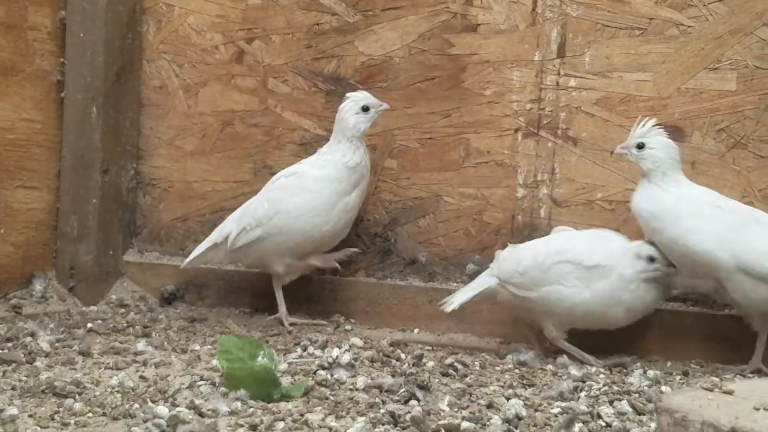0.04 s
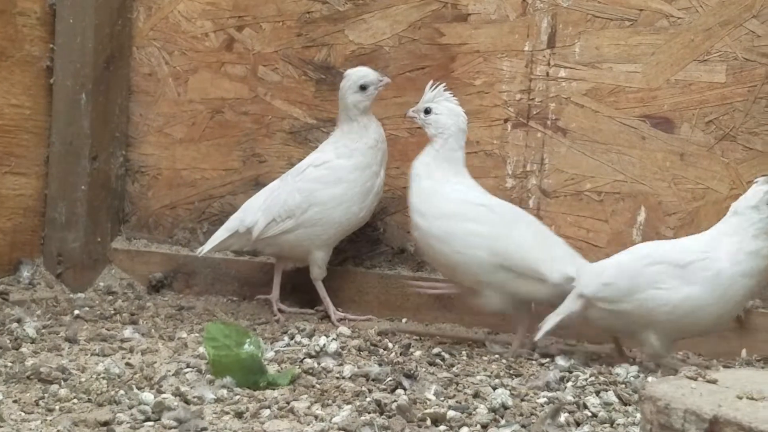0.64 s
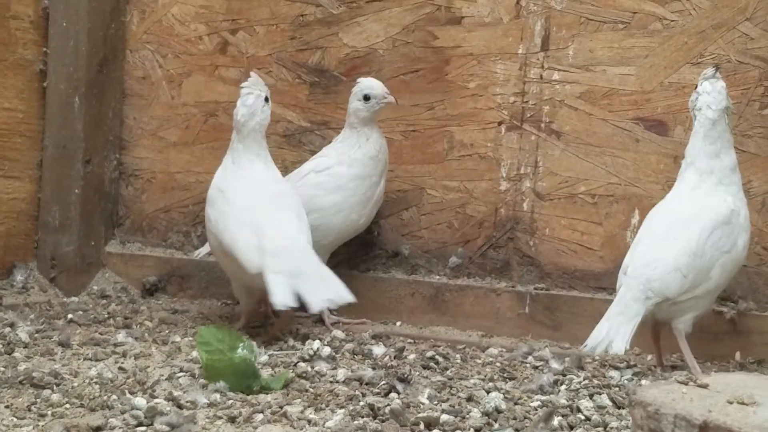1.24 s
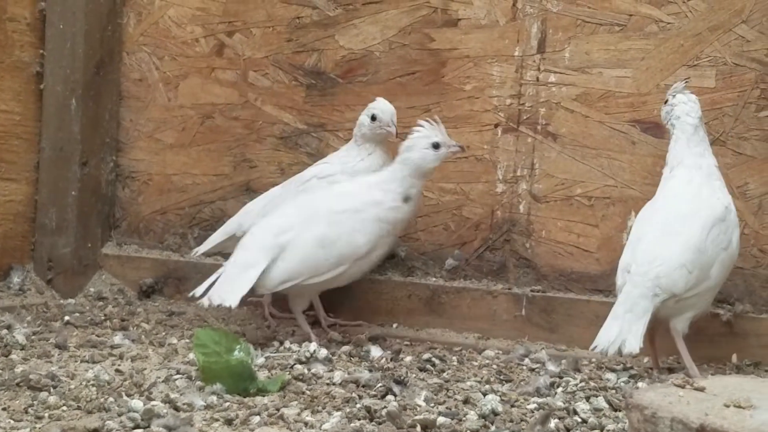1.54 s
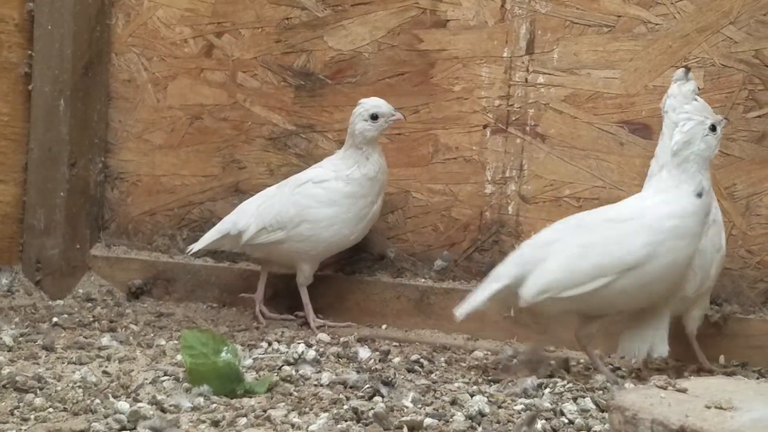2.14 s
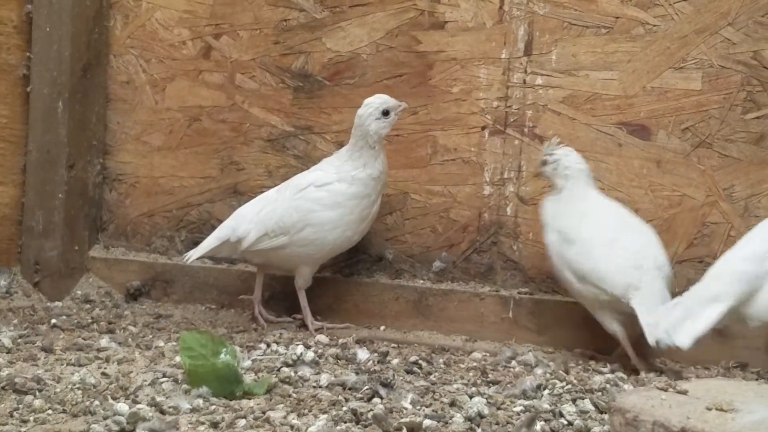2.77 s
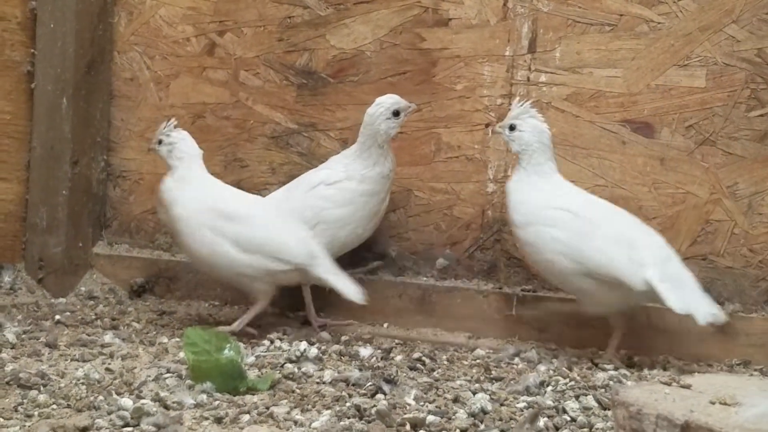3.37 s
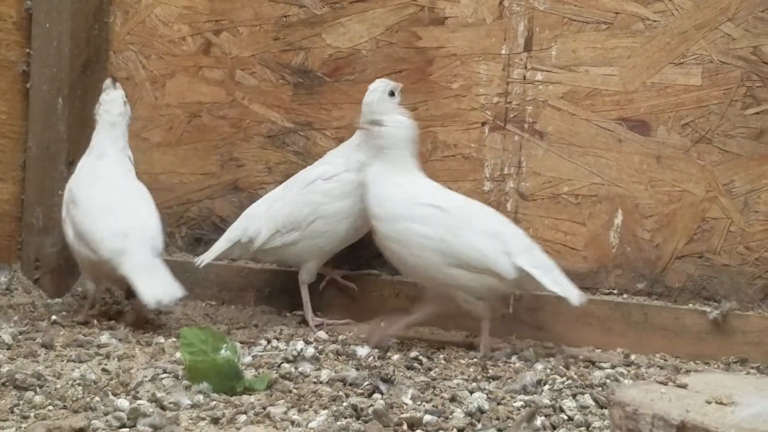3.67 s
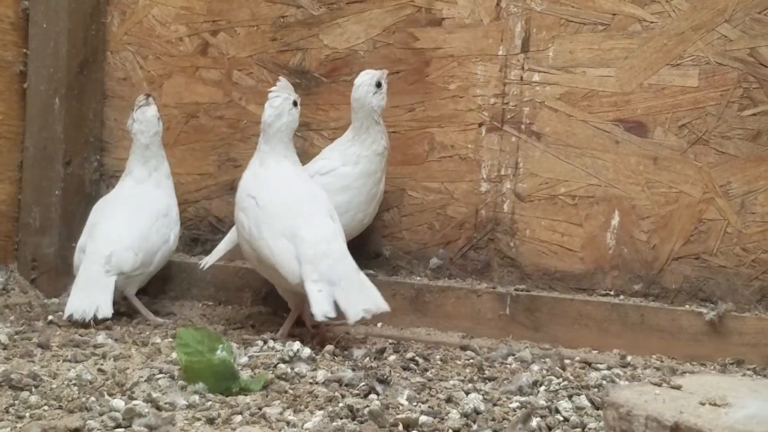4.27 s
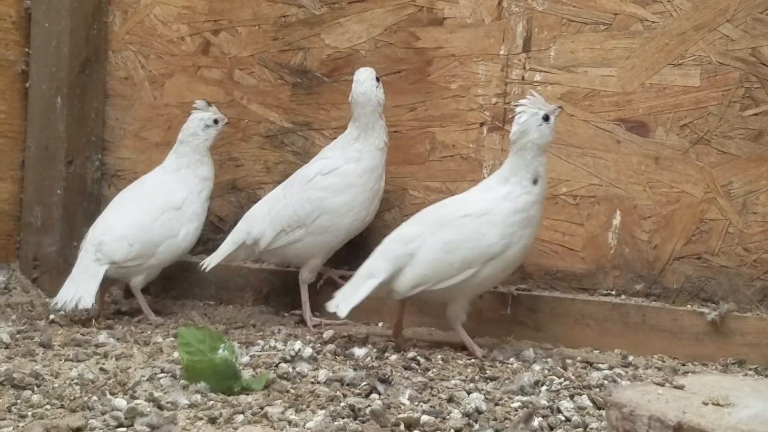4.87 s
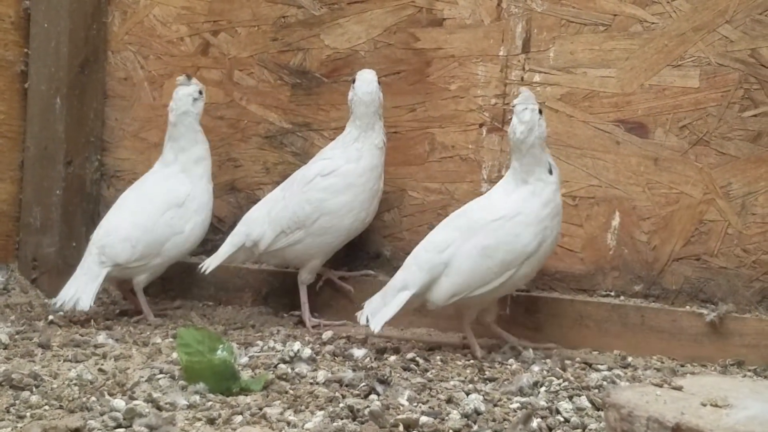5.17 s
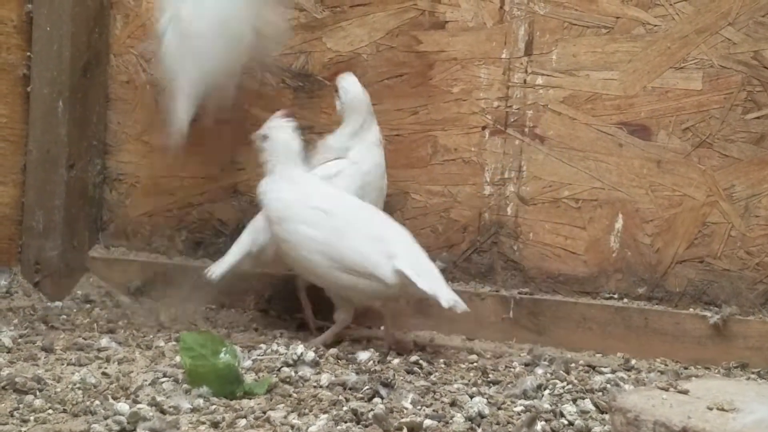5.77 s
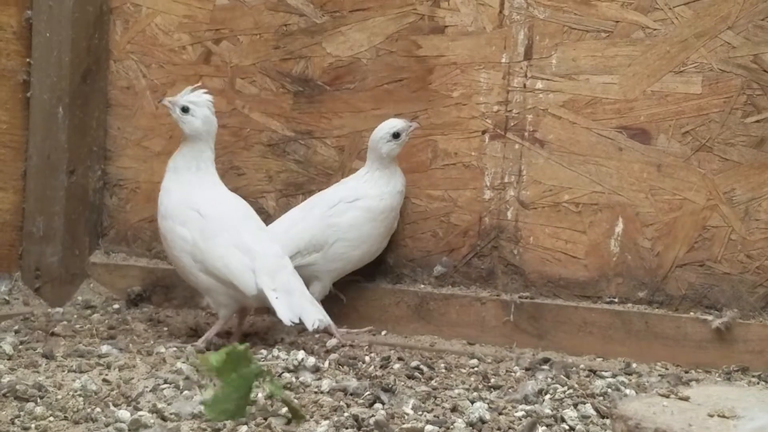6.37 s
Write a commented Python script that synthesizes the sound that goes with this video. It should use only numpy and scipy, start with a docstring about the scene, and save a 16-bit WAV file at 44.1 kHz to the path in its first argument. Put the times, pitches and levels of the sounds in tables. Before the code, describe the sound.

Quail chirp, whine and cluck over shifting gravel and a low rumble, then one bursts into flight with loud wingbeats.

```python
"""Bobwhite quail call in a plywood pen: hoarse upsweeps, sharp chips and whines, later clucks and
whistles, each a wavering tone from the syrinx thrown back by the close walls. Their feet stir the
gravel over a low outdoor rumble. Near the end one bird bursts into flight past the microphone: each
wingbeat is a feather slap and a push of air, followed by a draught and a last flutter."""
import sys
import numpy as np
from scipy import signal
from scipy.fft import rfft, irfft, next_fast_len
from scipy.io import wavfile

SR = 44100
rng = np.random.default_rng(int(sys.argv[2]) if len(sys.argv) > 2 else 0)


def master(y):
    """Save y as 16-bit WAV."""
    cut = np.clip(np.atleast_2d(y).T, -1, 1)
    pcm = np.round(cut * 32767)  # scale
    wavfile.write(sys.argv[1], SR, pcm.astype(np.int16))


N = 291942
TIME = np.arange(N) / SR
PROGRESS = np.linspace(0, 1, 60)   # through one call
TAKEOFF_S = 5.72

# spectrum of feathers slapping together: (frequency [Hz], level [dB])
SLAP_SPECTRUM = [(110, -1.5), (240, 1), (410, 3.5), (650, -6.5), (1050, -0.5), (1450, -4.5), (1850, -5.5),
                 (2650, -3.5), (3500, -12.5), (6000, -20), (16000, -33)]
# spectrum of feather hiss: (frequency [Hz], level [dB])
HISS_SPECTRUM = [(1500, -31), (3500, -0.5), (5500, -0.5), (9000, -5), (12000, 2.5), (16000, -0.5)]


def from_db(db):
    """Decibels to gain."""
    return 10 ** (np.asarray(db) / 20)


def rms_one(x):
    """Scale to unit rms."""
    return x / np.sqrt(np.mean(x ** 2) + 1e-20)


def in_time(rows, t=TIME):
    """Join the rows of a curve by straight lines."""
    s, *columns = np.transpose(rows)
    return [np.interp(t, s, c) for c in columns]


def at_hz(points, hz):
    """Read a spectrum on a log-frequency axis."""
    f, value = np.transpose(points)
    return np.interp(np.log(hz + 1), np.log(f), value)


def drift(rate, size=N):
    """A random wander with a spread near one, turning `rate` times a second."""
    knots = rng.standard_normal(size // 8 + 2)
    return np.interp(np.arange(size) * rate / SR, np.arange(len(knots)), knots)


def noise(spectrum):
    """Coloured stereo noise, alike on both sides in the bass and unrelated in the treble."""
    # likeness of left and right at the microphone: (frequency [Hz], correlation [0 to 1])
    likeness = [(100, 0.91), (250, 0.77), (500, 0.61), (1000, 0.32), (2000, 0.042), (16000, 0.011)]
    size = next_fast_len(N, True)
    hz = np.arange(size // 2 + 1) * SR / size
    mid, side = rfft(rng.standard_normal((2, size)))
    alike = at_hz(likeness, hz)
    both = np.sqrt(1 + alike) * mid + np.sqrt(1 - alike) * side * [[1], [-1]]
    return rms_one(irfft(both * from_db(at_hz(spectrum, hz)), size)[:, :N])


def grains(spectrum, rough_db, rate):
    """Noise broken into many tiny contacts."""
    return rms_one(noise(spectrum) * from_db(rough_db * np.clip(drift(rate), -2, 2)))


def bursts(starts, rises, levels_db, t60, tail_db, tail_t60):
    """Envelope of blows that swell, fall quickly and leave a weak tail."""
    power = np.zeros(N)
    for s, rise, db in np.broadcast(starts, rises, levels_db):
        at = int(s * SR)
        t = TIME[:min(SR // 3, N - at)]
        after = np.maximum(t - rise, 0)
        fall = from_db(-60 * after / t60) + from_db(tail_db - 60 * after / tail_t60)
        power[at:at + len(t)] += (from_db(db) * np.minimum(t / rise, 1) * fall) ** 2
    return np.sqrt(power)


def ring(x, hz, t60):
    """One resonance: a click sets a decaying sine ringing."""
    r, w = from_db(-60 / (t60 * SR)), 2 * np.pi * hz / SR
    return signal.lfilter([0, np.sin(w)], [1, -2 * r * np.cos(w), r * r], x + 1e-18)


def pan(left_db):
    """Gains for a source that is louder on the left by so much."""
    return from_db([[left_db / 2], [-left_db / 2]])


def outdoor_rumble():
    """The open air around the pen: low noise that swells in a few resonances."""
    # outdoor background: (frequency [Hz], level [dB])
    spectrum = [(15, -29), (30, -7.5), (60, -1.5), (100, -7.5), (130, -5), (240, -9), (400, -16.5),
                (600, -19), (980, -15.5), (1700, -24), (3000, -30.5), (5300, -41.5), (9200, -44.5),
                (14700, -38)]
    # resonances of the rumble: (frequency [Hz], level [dB], t60 [s])
    modes = [(37.6, -10, 0.31), (76, -4, 0.19), (152.2, -7.5, 0.2), (214.8, -14, .16), (331.7, -22, 0.18)]
    swellings = sum(from_db(db) * rms_one(ring(rng.standard_normal(N), hz, t60)) for hz, db, t60 in modes)
    return from_db(-50.6) * (from_db(-3) * noise(spectrum) + from_db(-1) * swellings) * pan(-2.2)


def pen(x, diffuse_db, t60):
    """Close plywood walls throw back a few echoes and a short diffuse ring."""
    # wall echoes, a list for the left and one for the right: (delay [s], level [dB])
    walls = [
        [(.0043, -6.5), (.0117, -3), (.0205, -8)],
        [(.0061, -6.5), (.0139, -7), (.0242, -10.5)],
    ]
    t = TIME[:SR // 3]
    response = rng.standard_normal((2, len(t))) * from_db(-60 * t / t60) * (t > .005)
    response *= from_db(diffuse_db) / np.sqrt(np.sum(response ** 2, axis=1, keepdims=True))
    response[:, 0] += 1   # straight to the microphone
    for side, echoes in zip(response, walls):
        for delay, db in echoes:
            side[int(delay * SR)] += from_db(db)
    return signal.fftconvolve(x[None], response, axes=1)[:, :N]


def gravel(faint_count=22):
    """Claws flick fine grit, with faint random footfalls until take-off, over shifting gravel."""
    # the clearest flicks: (time [s], level [dB])
    flicks = [(0.1376, -53), (0.4845, -40), (0.6858, -54), (0.7467, -50), (0.8056, -52), (0.8719, -54.5),
              (1.7814, -49), (1.8746, -52.5), (1.9789, -51), (2.0896, -53), (2.5591, -56), (2.811, -54),
              (2.9891, -51), (3.0834, -56), (3.355, -53), (3.404, -47), (4.146, -49), (4.582, -56.5),
              (4.9297, -50), (5.4864, -54), (5.5393, -48)]
    # gravel shifting underfoot: (time [s], level [dB])
    shuffle = [(0, -75), (.3, -70), (.5, -66), (.9, -68.5), (1.05, -81.5), (3, -69), (3.6, -86), (5.7, -80)]
    # fine grit: (frequency [Hz], level [dB])
    spectrum = [(1500, -12), (4000, -12), (6000, -4), (9000, -10), (12500, 2.5), (16000, 1.5)]
    when, strength = rng.random((faint_count, 2)).T
    faint_s = when * TAKEOFF_S
    faint_db = in_time(shuffle, faint_s)[0] + 7 + 4 * strength
    clear = [(s, db - 7.5) for s, db in flicks]
    s, db = np.vstack([clear, np.c_[faint_s, faint_db]]).T
    grit = bursts(s, .0025, db, t60=.054, tail_db=-5, tail_t60=.25)
    grit = grit * grains(spectrum, rough_db=3.5, rate=930)
    shuffling = from_db(in_time(shuffle)[0]) * grains(spectrum, rough_db=1, rate=100)
    return (grit + shuffling) * pan(-.4)


def pebbles():
    """Now and then a foot knocks pebbles together."""
    # pebble strikes: (time [s], level [dB])
    strikes = [(.422, -43.5), (.726, -50), (0.939, -47.5), (2.09, -51.5), (2.1, -52.5), (3.331, -51),
               (3.346, -58), (3.403, -43)]
    # stone on stone: (frequency [Hz], level [dB])
    spectrum = [(500, -22), (1200, -3), (1700, 5), (3200, 1.5), (5000, -12.5), (9000, -21), (16000, -38)]
    s, db = np.transpose(strikes)
    envelope = bursts(s, .0012, db, t60=.05, tail_db=-12, tail_t60=.22)
    return envelope * grains(spectrum, rough_db=4, rate=800)


def board_knock():
    """A foot lands on the base board with a dull thud."""
    # footfall on the board: (time [s], level [dB])
    knocks = [(2.09, -45.5)]
    s, db = np.transpose(knocks)
    board = noise([(70, -17), (155, -1), (350, -5), (900, -13.5), (2000, -24), (6000, -47)])
    return bursts(s, .004, db, t60=.19, tail_db=-12, tail_t60=.3) * board


def draught():
    """Air and rustling plumage as the flying bird passes the microphone."""
    # course of the flight: (time [s], draught [dB], rustle [dB])
    flight = [(5.705, -93, -69), (5.725, -38, -33.5), (5.8, -33.5, -30.5), (5.98, -24.5, -40.5),
              (6.17, -27, -42.5), (6.36, -29.5, -42), (6.41, -42, -49), (6.55, -30.5, -40.5),
              (6.62, -38.5, -38)]
    # moving air: (frequency [Hz], level [dB])
    spectrum = [(25, -15), (40, -6.5), (85, 2.5), (120, -5.5), (170, -8), (300, -14.5), (600, -39),
                (2000, -57)]
    air_db, rustle_db = in_time(flight)
    air = from_db(air_db - 3) * noise(spectrum)
    plumage = grains(SLAP_SPECTRUM, rough_db=1.5, rate=370)
    plumage += from_db(-8.5) * grains(HISS_SPECTRUM, rough_db=6, rate=400)
    return air * pan(-3) + from_db(rustle_db + .5) * plumage * pan(.85)


def wing_strokes(beat_s=.0592, flutter_hollow_hz=1495):
    """Beats and flutters: (time [s], rise [s], push [dB], slap [dB], hiss [dB], hollow [Hz])."""
    # successive wingbeats: (air push [dB], slap [dB], hiss [dB], hollow under the wing [Hz])
    beats = [(-27.5, -21, -28.5, 820), (-14.5, -25, -26, 2450), (-13, -25, -30, 2680),
             (-17.5, -29.5, -32, 2260), (-20.5, -23.5, -28, 2100), (-22, -23, -28.5, 1460),
             (-23.5, -22, -25, 1410), (-16.5, -19.5, -23, 980), (-20.5, -22, -20.5, 2940),
             (-22.5, -33, -36.5, 1110)]
    # loose flutters of half-open wings: (time [s], rise [s], level [dB])
    flutters = [(5.826, .0046, -28), (6.296, 0.0023, -33), (6.345, 0.016, -28.5), (6.462, .004, -38),
                (6.492, 0.0056, -40), (6.536, .004, -31), (6.555, 0.0029, -28.5)]
    starts = TAKEOFF_S + beat_s * np.arange(len(beats))
    rises = np.geomspace(.0145, .0022, len(beats))   # the strokes sharpen as the bird gains speed
    loose = [(s, rise, db - 8.5, db, db - .5, flutter_hollow_hz) for s, rise, db in flutters]
    return np.vstack([np.c_[starts, rises, beats], loose])


def wings():
    """Each stroke slaps the feathers together and shoves air into the pen, which booms briefly."""
    # modes of the pen's air and boards: (frequency [Hz], level [dB], t60 [s])
    modes = [(82, -14, 0.14), (131, -3.5, 0.065), (167, -1, 0.17), (230, -5.5, 0.079), (298, -6.5, 0.077),
             (358, -6.5, 0.075), (434, -14.5, .06)]
    starts, rises, push_db, slap_db, hiss_db, hollow_hz = wing_strokes().T
    slap = bursts(starts, rises, slap_db, t60=.1, tail_db=-19.5, tail_t60=.18)
    slap = slap * grains(SLAP_SPECTRUM, rough_db=2.4, rate=700)
    pushes = np.zeros(N)
    for start, rise, shove_db, db, hz in zip(starts, rises, push_db, slap_db, hollow_hz):
        at = int(start * SR)
        t = TIME[:min(SR // 8, N - at)]
        # the pocket of air under the wing colours every stroke differently
        hollow = rms_one(ring(rng.standard_normal((2, len(t))), hz, t60=.015))
        envelope = np.minimum(t / rise, 1) * from_db(db - 4.5 - 60 * np.maximum(t - rise, 0) / .1)
        slap[:, at:at + len(t)] += hollow * envelope
        # a slower stroke gives a rounder push of air
        shove = np.exp(-.5 * ((t - .29 * rise) / (.064 * rise)) ** 2)
        pushes[at:at + len(t)] -= from_db(shove_db) * shove / shove.sum()
    boom = sum((-1) ** k * from_db(db) * ring(pushes, hz, t60) for k, (hz, db, t60) in enumerate(modes))
    hiss = bursts(starts, rises, hiss_db, t60=.08, tail_db=-22, tail_t60=.11)
    hiss = hiss * grains(HISS_SPECTRUM, rough_db=3, rate=1500)
    # one stroke cracks like a whip
    crack = bursts(starts=[6.1935], rises=.001, levels_db=-13.5, t60=.02, tail_db=-25, tail_t60=.06)
    hiss += crack * grains(HISS_SPECTRUM, rough_db=4, rate=1500)
    return boom * pan(-3) + slap * pan(.85) + hiss * pan(-1.1)


def syrinx(calls, overtone_db, jitter, flutter_db, edge_s=.004):
    """The bird's voice: an unsteady tone of four harmonics, each one step below the last."""
    out = np.zeros(N)
    for call in calls:   # rows of (time [s], pitch [Hz], level [dB], optional overtone step [dB])
        start, end = call[0][0] - edge_s, call[-1][0] + edge_s
        span = slice(max(int(start * SR), 0), int(end * SR))
        t = TIME[span]
        hz, db, *own_step = in_time(call, t)
        step_db = own_step[0] if own_step else overtone_db
        hz = hz * (1 + jitter * drift(350, size=SR)[:len(t)])
        phase = 2 * np.pi * np.cumsum(hz) / SR
        gate = np.sin(np.pi / 2 * np.clip(np.minimum(t - start, end - t) / (2 * edge_s), 0, 1))
        tone = sum(from_db(step_db * (k - 1)) * np.sin(k * phase) * (hz * k < SR / 2) for k in range(1, 5))
        out[span] += np.sqrt(2) * tone * gate * from_db(db + flutter_db * drift(88.2, size=SR)[:len(t)])
    return out


def swell(peak_at, rise_db, fall_db):
    """Level through a call: up to a peak at this share of its length, then down."""
    return np.interp(PROGRESS, [0, peak_at, 1], [-rise_db, 0, -fall_db])


def throat(hz, db_per_octave, resonance_hz=2600):
    """Level lost as the pitch leaves the throat's resonance."""
    return -db_per_octave * np.abs(np.log2(hz / resonance_hz))


def cheeps():
    """Raspy falling cheeps from further off, heard mostly by way of the walls."""
    # cheeps: (time [s], length [s], starting pitch [Hz], level [dB])
    notes = [(0.106, .11, 4680, -57), (.54, 0.073, 4200, -61), (0.738, .11, 4600, -58),
             (1.45, 0.096, 4600, -60.5), (1.891, .1, 4410, -60), (2.56, .1, 4010, -67),
             (3.029, .06, 3490, -61.5), (3.501, .11, 4200, -69.5), (4.974, .11, 4670, -63.5)]
    calls = [[(s, hz, db - 3.5), (s + length / 2, .78 * hz, db - 1.5), (s + length, .6 * hz, db)]
             for s, length, hz, db in notes]
    voice = syrinx(calls, overtone_db=-34, jitter=.06, flutter_db=3.5)
    return pen(voice, diffuse_db=7.5, t60=.4) * pan(1) * from_db(-11)


def twitters(octaves_per_s=4.5, scoop_s=.018):
    """Thin falling notes, some scooping up first, often two at once from both sides of the syrinx."""
    # twitters: (time [s], length [s], pitch [Hz], scoop from below [Hz], level [dB])
    notes = [(2.185, .122, 5300, 1300, -62.5), (2.255, .072, 3380, -4, -53), (2.31, .055, 5580, 0, -68),
             (2.449, .085, 4170, 0, -65), (2.455, .09, 3240, 0, -59), (3.855, .094, 5200, 1100, -59),
             (3.912, .062, 3480, 0, -55), (5.5, .1, 4900, 0, -57), (5.617, .04, 5480, 0, -65)]
    calls = []
    for s, length, top_hz, scoop_hz, db in notes:
        t = length * PROGRESS
        hz = top_hz * 2 ** (-octaves_per_s * t) - scoop_hz * np.exp(-t / scoop_s)
        calls.append(np.c_[s + t, hz, db + swell(.75, rise_db=15, fall_db=3)])
    voice = syrinx(calls, overtone_db=-32, jitter=.013, flutter_db=3)
    return pen(voice, diffuse_db=0, t60=.18) * pan(2) * from_db(-7.5)


def whistles(plunge_s=.075):
    """A quick plunge, then a long line sinking towards the throat's resonance."""
    # whistles: (time [s], length [s], plunge [Hz], sinking from [Hz], to [Hz], level [dB])
    notes = [(4.482, .615, 2005, 3640, 2318, -52.5), (5.264, .435, 1600, 4030, 2540, -50.5)]
    calls = []
    for s, length, plunge_hz, from_hz, to_hz, db in notes:
        t = length * PROGRESS
        hz = from_hz + (to_hz - from_hz) * PROGRESS + plunge_hz * np.exp(-t / plunge_s)
        level_db = db + throat(hz, db_per_octave=17.5) + swell(.3, rise_db=6, fall_db=4)
        calls.append(np.c_[s + t, hz, level_db])
    voice = syrinx(calls, overtone_db=-38, jitter=.017, flutter_db=4.2)
    return pen(voice, diffuse_db=3, t60=.53) * pan(2.2) * from_db(-8.5)


def upsweeps():
    """Hoarse calls that rise ever faster, loudest nearest the throat's resonance."""
    # upsweeps: (time [s], length [s], first pitch [Hz], last pitch [Hz], level [dB])
    notes = [(-.06, .1, 1550, 3950, -46), (0.143, .12, 1594, 3675, -49), (0.391, 0.079, 1615, 3760, -48),
             (0.596, 0.1, 1670, 3780, -48), (4.177, .065, 2330, 3220, -63.5),
             (5.478, 0.021, 3710, 4550, -58)]
    calls = []
    for s, length, first_hz, last_hz, db in notes:
        hz = first_hz + (last_hz - first_hz) * PROGRESS ** 2.2
        calls.append(np.c_[s + length * PROGRESS, hz, db + throat(hz, db_per_octave=18)])
    voice = syrinx(calls, overtone_db=-34, jitter=.045, flutter_db=-2)
    return pen(voice, diffuse_db=1, t60=.33) * pan(3.3) * from_db(-5)


def whines():
    """Close by on the left, held notes that sag or arch and bend late to their last pitch."""
    # whines: (time [s], length [s], first pitch [Hz], last pitch [Hz], sag [Hz], level [dB])
    notes = [(0.523, .21, 1538, 1430, 213.5, -51), (0.762, .135, 1600, 2435, -59, -53.5),
             (1.432, 0.14, 1570, 1600, -20, -49), (1.614, 0.17, 1598, 1900, -25, -50.5),
             (1.899, 0.094, 1598, 2180, 0, -51.5)]
    calls = []
    for s, length, first_hz, last_hz, sag_hz, db in notes:
        hz = first_hz + (last_hz - first_hz) * PROGRESS ** 2.9 - sag_hz * np.sin(np.pi * PROGRESS) ** 2
        calls.append(np.c_[s + length * PROGRESS, hz, db + swell(.5, rise_db=2.5, fall_db=4.5)])
    voice = syrinx(calls, overtone_db=-23, jitter=.014, flutter_db=3.5)
    return pen(voice, diffuse_db=2, t60=.12) * pan(4) * from_db(-6.5)


def clucks(break_hz=443, leap_s=.055, squeak_s=.024, end_s=.025):
    """Close by, a reedy low note gives way, thins while it leaps and lands on a purer squeak."""
    # clucks: (time [s], hold [s], pitch [Hz], level [dB], squeak [Hz], squeak [dB], end [Hz], end [dB])
    notes = [(2.693, 0.016, 407, -50, 2030, -56, 1740, -64),
             (3.881, .069, 436.4, -41, 1892, -45.5, 793, -47),
             (4.255, .06, 380.3, -45.5, 1960, -50, 1880, -61)]
    reediness = [(400, -6.5), (520, -14), (900, -16), (1900, -20)]   # (pitch [Hz], overtone step [dB])
    calls = []
    for s, hold, first_hz, db, squeak_hz, squeak_db, end_hz, end_db in notes:
        low_db = db + swell(.68, rise_db=2.5, fall_db=3.5)
        low = np.c_[s + hold * PROGRESS, first_hz + (break_hz - first_hz) * PROGRESS, low_db]
        leap_hz = break_hz * (.96 * squeak_hz / break_hz) ** PROGRESS
        dip_db = [low_db[-1], db - 9, db - 6.5, squeak_db - 14, squeak_db]
        leap_db = np.interp(PROGRESS, [0, .15, .4, .75, 1], dip_db)
        leap = np.c_[s + hold + leap_s * PROGRESS, leap_hz, leap_db]
        top_s = s + hold + leap_s + squeak_s
        squeak = [(top_s, squeak_hz, squeak_db - 4),
                  (top_s + end_s / 2, squeak_hz + .7 * (end_hz - squeak_hz), end_db - 2),
                  (top_s + end_s, end_hz, end_db)]
        rows = np.vstack([low, leap, squeak])
        calls.append(np.c_[rows, at_hz(reediness, rows[:, 1])])
    voice = syrinx(calls, overtone_db=None, jitter=.025, flutter_db=3)
    return pen(voice, diffuse_db=-6, t60=.15) * pan(-.46) * from_db(-2)


def chips():
    """Sharp chips near the microphone: the pitch plunges within milliseconds, with a rasp on top."""
    # chips: (time [s], level [dB], final pitch [Hz])
    notes = [(.385, -44, 1723), (.9, -39, 1896), (1.329, -37, 1842), (1.796, -39.5, 1872),
             (2.008, -38.5, 1906)]
    # rasp in the voice: (frequency [Hz], level [dB])
    rasp_spectrum = [(1500, -25), (2400, 4), (3200, -2), (3900, 1), (5100, -24), (5800, -5.5), (6600, -10),
                     (7400, -15), (9000, -25)]
    calls = [[(s, 1.42 * hz, db - 12), (s + .00507, 1.17 * hz, db),
              (s + .0118, 1.03 * hz, db - 3), (s + .026, hz, db - 12)] for s, db, hz in notes]
    voice = syrinx(calls, overtone_db=-18, jitter=.055, flutter_db=2, edge_s=.002)
    s, db, _ = np.transpose(notes)
    rasp = bursts(s + .0033, .0069, db - 15, t60=.12, tail_db=-10.5, tail_t60=.19)
    rasp = rasp * grains(rasp_spectrum, rough_db=-2, rate=890)
    return pen(voice, diffuse_db=-2, t60=.16) * pan(1.5) * from_db(-3) + rasp


def scene():
    """Feet, wings and voices in the pen, over the steady rumble."""
    rumble = outdoor_rumble()
    feet = gravel() + pebbles() + board_knock()
    flight = draught() + wings()
    other_birds = cheeps() + twitters() + whistles() + upsweeps()
    near_birds = whines() + clucks() + chips()
    return rumble + feet + flight + other_birds + near_birds


def record(dry):
    """The top is cut steeply."""
    cutoff_hz = 16100
    return signal.sosfilt(signal.ellip(10, .2, 70, cutoff_hz, fs=SR, output="sos"), dry)


dry = scene()
out = record(dry)
master(out)
```